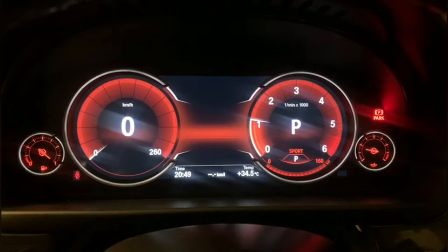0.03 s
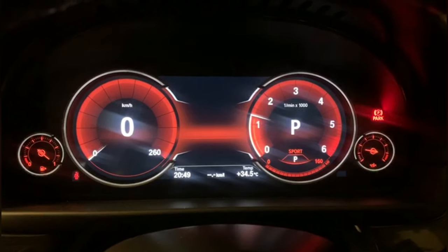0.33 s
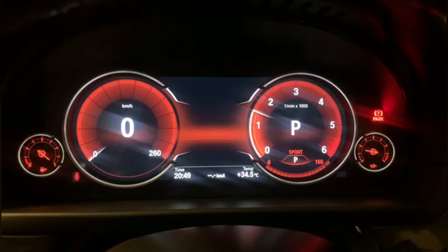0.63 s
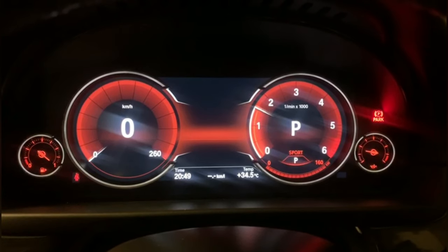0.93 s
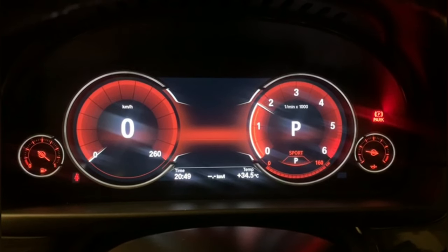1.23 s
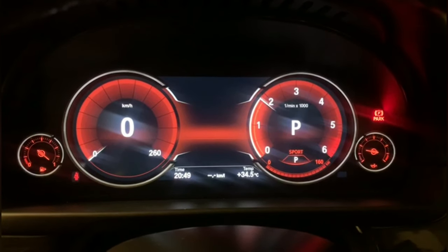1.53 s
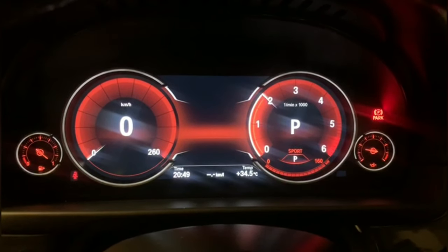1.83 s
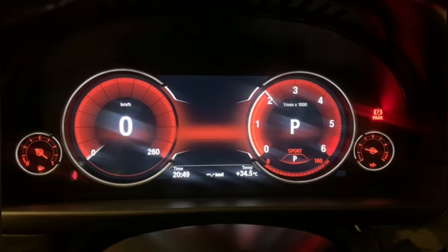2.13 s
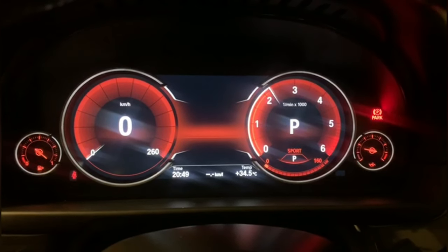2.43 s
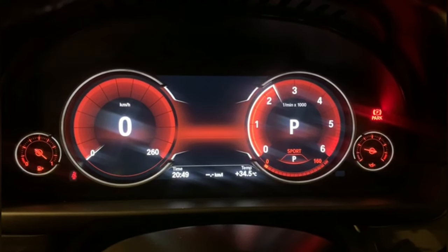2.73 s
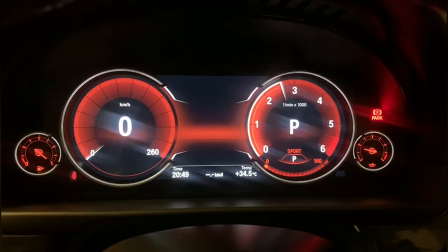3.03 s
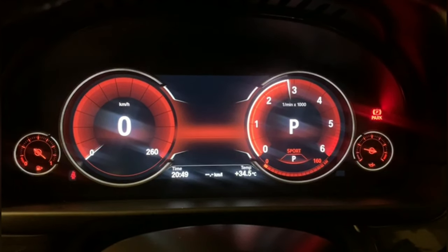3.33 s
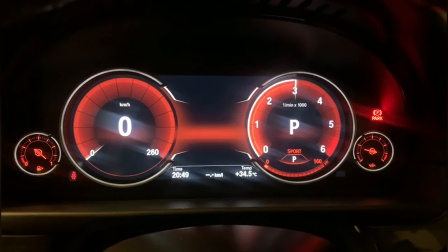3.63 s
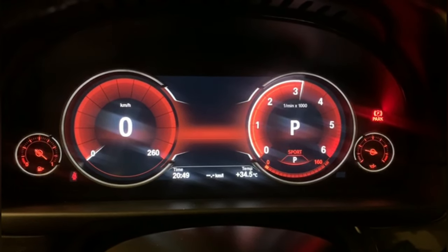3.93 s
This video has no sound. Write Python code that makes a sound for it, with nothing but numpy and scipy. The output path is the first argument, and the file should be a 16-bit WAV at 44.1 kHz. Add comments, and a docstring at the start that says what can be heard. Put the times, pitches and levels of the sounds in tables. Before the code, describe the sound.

Heard inside the cabin of a parked car, a diesel engine hums at low revs and climbs steadily. Two dull bumps sound near the start, then a faint whine and a hardening clatter build with the rising engine.

```python
"""A parked four-cylinder diesel is revved smoothly for four seconds, heard from the driver's seat.
It starts near 1250 rpm with the hum of its firing tone, and two soft thuds sound in the first second.
As it climbs, the harmonics boom in turn through the cabin's resonances and the belt drive whines faintly.
From about 2.5 s the cylinders pull less evenly and the clatter hardens, while the rush of the
engine bay keeps growing up to 3400 rpm."""
import sys
import numpy as np
from scipy import signal
from scipy.fft import rfft, irfft
from scipy.io import wavfile
from scipy.ndimage import uniform_filter1d

SR = 44100
rng = np.random.default_rng(int(sys.argv[2]) if len(sys.argv) > 2 else 0)


def generate_wav(signal):
    """Clip the signal to [-1, 1] and save it as 16-bit WAV at the path in sys.argv[1]."""
    frames = np.transpose(np.atleast_2d(signal))
    scaled = np.clip(frames, -1, 1) * 32767
    pcm = np.round(scaled).astype(np.int16)
    wavfile.write(sys.argv[1], SR, pcm)


N = 176400
TIME, FREQS = np.arange(N) / SR, np.fft.rfftfreq(N, 1 / SR)
CYLINDERS, REFERENCE_RATE_HZ = 4, 100
LEFT_LEAD_S = 0.000362


def amp(db):
    return 10 ** (np.asarray(db) / 20)


def read(points, hz, column=1):
    """One column of a table, interpolated over log frequency."""
    table = np.array(points, float)
    return np.interp(np.log(hz + 1), np.log(table[:, 0] + 1), table[:, column])


def ramp(x, low, high):
    """0 below low, 1 above high."""
    return np.clip((x - low) / (high - low), 0, 1)


# Engine speed. Each row: time in seconds, firing rate in Hz.
FIRING_RATE = [(0.0, 42.2), (0.25, 45.38), (0.5, 49.01), (0.75, 52.99), (1.0, 56.2), (1.25, 60.04),
               (1.5, 63.28), (1.75, 67.0), (2.0, 70.47), (2.25, 74.61), (2.5, 78.44), (2.75, 83.86),
               (3.0, 91.08), (3.25, 97.41), (3.5, 102.84), (3.75, 108.3), (4.0, 113.6)]

def crankshaft():
    """Phase is the integral of frequency: returns the firing rate and the running count of firings."""
    rate = np.interp(TIME, *np.transpose(FIRING_RATE))
    return rate, np.cumsum(rate) / SR


def tone(multiple, rate, firings, db):
    """A partial locked to the crankshaft; a path difference brings it to the left side first."""
    hz = multiple * rate
    phase = 2 * np.pi * (multiple * firings + rng.random())
    lead = 2 * np.pi * hz * LEFT_LEAD_S
    return np.sqrt(2) * amp(db) * side_gains(hz) * np.cos([phase + lead, phase])


# The firing tone in the cabin, with the body's nulls. Each row: frequency in Hz, level in dB.
HUM_LEVEL = [(42, -22.5), (43.6, -24.5), (44.6, -29), (46.2, -23.5), (49.5, -23.5), (51.5, -27.5),
             (53, -49), (54, -26.5), (56.4, -18.5), (60, -24), (62.8, -25.5), (64.5, -22.5), (70, -25),
             (72.6, -29.5), (74.2, -25), (78, -20), (84, -26), (92, -23), (96.5, -29.5), (103, -21.5),
             (113, -22)]

def firing_hum(rate, firings, waver_db=0.86):
    """Forced vibration: periodic combustion drives the body at the firing rate."""
    return tone(1, rate, firings, read(HUM_LEVEL, rate) + waver_db * waver(hz=10))


# Engine orders. Each entry: vibrations per engine cycle, then source levels in dB at low, high, top revs.
ORDER_LEVELS = {3: (-38, -24, -28), 6: (-38, -27, -36), 7: (-45, -37, -34), 8: (-21.3, -22, -17),
                9: (-42, -34, -27), 10: (-52, -23, -30), 11: (-44, -30, -28), 12: (-23.3, -24, -19.5),
                13: (-52, -26, -30), 14: (-46, -31, -29), 15: (-45, -31, -27), 16: (-28.5, -35, -35),
                17: (-42, -26, -22), 20: (-32, -30, -24.5), 24: (-40, -28, -23), 28: (-40, -28, -25),
                32: (-45, -27, -24), 35: (-46, -27, -24), 56: (-48, -36, -35)}

def engine_orders(rate, firings):
    """Harmonics of the engine cycle: uneven cylinders strengthen those between the firing harmonics."""
    uneven, top = ramp(rate, 78.4, 92.6), ramp(rate, 101, 104.3)
    out = np.zeros((2, N))
    for order, (low_db, high_db, top_db) in ORDER_LEVELS.items():
        multiple = order / CYLINDERS
        hz = multiple * rate
        source_db = low_db + (high_db - low_db) * uneven + (top_db - high_db) * top
        waver_db = 1.44 + 3.5 * ramp(hz, 330, 750)  # higher partials are rougher
        out += tone(multiple, rate, firings, source_db + cabin_db(hz) + waver_db * waver(hz=10))
    return out


# The cabin's response. Each row: frequency in Hz, gain in dB.
CABIN_RESPONSE = [(60, -8), (87, -8), (92, -13), (98, -23), (108, -23), (115, -15), (125, -10.5),
                  (132, -20), (140, -13), (146, -22), (151, -13), (157, -6), (164, 0.5), (182, 1.7),
                  (190, 0), (195, -13), (201, -9), (211, -19), (219, -19), (229, -15), (243, -23),
                  (260, -19), (280, -19), (325, -15), (365, -19), (470, -23), (530, -21), (570, -23),
                  (630, -33), (720, -29), (950, -28)]

def cabin_db(hz, panel_hz=394.5, width_hz=10.6, peak_db=9):
    """Resonance: a partial swells as it sweeps through a mode of the cabin or of one panel."""
    return read(CABIN_RESPONSE, hz) + peak_db * np.exp(-((hz - panel_hz) / width_hz) ** 2)


# Clatter relative to the rush. Each row: frequency in Hz, gain in dB.
CLATTER_SPECTRUM = [(250, -4), (480, 1), (800, 0), (2000, -1), (4000, -4)]

def clatter(rate, firings, size=8192, firing_accent_db=4, cabin_t60_s=0.15):
    """Periodic excitation: injectors and valves repeat each engine cycle, and the cabin scatters it."""
    orders = np.arange(240)
    strength = (orders >= 21) * amp(firing_accent_db * (orders % CYLINDERS == 0))
    cycle = irfft(strength * np.exp(2j * np.pi * rng.random(len(orders))), size) * size / 2
    pattern = np.interp(firings / CYLINDERS, np.arange(size) / size, cycle, period=1)
    pattern *= np.sqrt(2 * rate / CYLINDERS)  # constant power per Hz as the lines spread
    echoes = rng.standard_normal((2, size)) * amp(-60 * TIME[:size] / cabin_t60_s)
    echoes /= np.linalg.norm(echoes, axis=1, keepdims=True)
    scattered = signal.fftconvolve(pattern[None], echoes, axes=1)[:, :N]
    return irfft(rfft(scattered) * amp(read(CLATTER_SPECTRUM, FREQS)), N)


# Rush of the engine bay. Each row: frequency in Hz, base spectral density in dB at the reference rate,
# growth in dB per doubling of speed.
RUSH_SPECTRUM = [(22, -71, -3.5), (44.6, -62.5, 2), (63, -47, 4), (90, -55.5, 3), (130, -56.5, -1),
                 (172, -57.5, 2.5), (265, -62, 5.5), (294, -58.5, 6.5), (430, -67.5, 3.5), (567, -70, 5.5),
                 (923, -69.5, 5.5), (990, -78, 6), (1330, -76.5, 8), (2200, -81, 6.5), (3100, -83, 9),
                 (4340, -85.5, 5.5), (6620, -88, 9), (6950, -100.5, 8), (10900, -97, 14.5)]
# Resonances of block and covers. Each row: centre in Hz, width in Hz, gain in dB.
BLOCK_MODES = [(738, 15, 3), (805, 20, 3), (918, 30, 4), (1115, 30, 3.5), (1286, 50, 5), (1435, 30, 3),
               (1520, 35, 4.5), (1845, 50, 7.5), (2080, 50, 3), (2420, 120, 4), (2750, 50, 4.5),
               (2980, 70, -3), (3150, 60, 4.5), (3430, 100, 5.5), (3790, 60, 2), (3960, 90, -3),
               (4230, 120, 4), (4620, 90, -2.5), (4880, 50, 2.5), (5720, 50, 2.5)]
# Fine, still ripple left by cabin reflections. Each row: frequency in Hz, standard deviation in dB.
REFLECTION_RIPPLE = [(600, 0), (1500, 1), (4000, 1.8), (9000, 2.2)]

def bay_spectrum_db(hz, rate, knock_db=4, knock_hz=1460, knock_octaves=0.71):
    """Resonant filtering by block and cabin, over frequency and time; speed brightens the spectrum."""
    modes = sum(db * np.exp(-((hz - centre) / width) ** 2) for centre, width, db in BLOCK_MODES)
    ripple = read(REFLECTION_RIPPLE, hz) * rng.standard_normal(len(hz))
    steady = read(RUSH_SPECTRUM, hz) + modes + ripple
    growth = np.outer(read(RUSH_SPECTRUM, hz, column=2), np.log2(rate / REFERENCE_RATE_HZ))
    knock_band = knock_db * np.exp(-(np.log2((hz + 1) / knock_hz) / knock_octaves) ** 2)
    knock = np.outer(knock_band, rate > 81)  # combustion turns hard at this firing rate
    return steady[:, None] + growth + knock


# Fine random patchiness, mostly in the treble. Each row: frequency in Hz, standard deviation in dB.
SHIMMER_DEPTH = [(200, .5), (700, 1), (1200, 1.8), (2200, 2), (4000, 3), (9000, 2)]

def shimmer_db(hz, frames):
    """Random amplitude modulation in patches of frequency and time: a faint watery shimmer over noise."""
    patches = uniform_filter1d(rng.standard_normal((len(hz), frames)), 8, axis=0)
    patches = uniform_filter1d(patches, 3, axis=1)
    return read(SHIMMER_DEPTH, hz)[:, None] * patches / patches.std()


# Likeness of left and right. Each row: frequency in Hz, coherence from 0 to 1.
COHERENCE = [(100, 1), (200, 0.76), (300, 0.11), (430, 0.083), (560, 0.59), (700, 1), (900, 0.4),
             (1050, 0.21), (1300, 0.42), (1850, 0.17), (2600, 0.34), (4100, 0.13), (6000, 0.11),
             (11000, .05)]

def engine_bay(rate, firings):
    """Source and filter: throbbing rush and clatter ring the block and arrive partly coherent."""
    throb = 1 + 0.033 * np.cos(2 * np.pi * firings / CYLINDERS) + 0.012 * np.cos(2 * np.pi * firings)
    rush = rng.standard_normal((2, N)) * np.sqrt(SR / 2)
    drive = throb * (rush + clatter(rate, firings))
    framing = dict(fs=SR, nperseg=2048, noverlap=1536)
    hz, times, (shared, separate) = signal.stft(drive, **framing)
    coherence = read(COHERENCE, hz)[:, None]
    left = shared * np.exp(2j * np.pi * hz * LEFT_LEAD_S)[:, None]
    right = coherence * shared + np.sqrt(1 - coherence ** 2) * separate
    gain_db = bay_spectrum_db(hz, np.interp(times, TIME, rate)) + shimmer_db(hz, len(times))
    spectra = np.array([left, right]) * side_gains(hz)[:, :, None] * amp(gain_db)
    return signal.istft(spectra, **framing)[1][:, :N]


# Belt-driven accessories. Each row: multiple of the firing rate, source level in dB at the reference
# rate, growth in dB per doubling of speed.
ACCESSORY_TONES = [(4.55, -29.5, 5), (4.79, -28, 4), (5.78, -33, 1), (8.3, -24.5, 13), (10.55, -24, 9)]

def belt_whine(rate, firings, waver_db=2):
    """Non-integer drive ratios put the accessories' faint tones between the engine orders."""
    doublings = np.log2(rate / REFERENCE_RATE_HZ)
    out = np.zeros((2, N))
    for multiple, db, growth_db in ACCESSORY_TONES:
        source_db = db + growth_db * doublings + waver_db * waver(hz=8)
        out += tone(multiple, rate, firings, source_db + cabin_db(multiple * rate))
    return out


# Soft thuds in the cabin. Each row: start in seconds, level in dB.
CABIN_THUDS = [(0.482, -29), (0.722, -33.5)]

def thuds(rise_s=0.0063, t60_s=0.17, corner_hz=130):
    """Damping: dull bumps of low noise decay exponentially in the upholstery."""
    low_band = ramp(FREQS, 27.5, 55) / (1 + (FREQS / corner_hz) ** 1.7)
    body = irfft(rfft(rng.standard_normal(N)) * low_band, N)
    envelope = np.zeros(N)
    for start, db in CABIN_THUDS:
        age = np.maximum(TIME - start, 0)
        envelope += amp(db - 60 * age / t60_s) * ramp(age, 0, rise_s)
    return envelope * body / body.std()


def waver(hz):
    """Low-pass noise: slow random motion of unit standard deviation."""
    motion = irfft(rfft(rng.standard_normal(N)) * np.exp(-(FREQS / hz) ** 2), N)
    return motion / motion.std()


# Balance at the driver's seat. Each row: frequency in Hz, left minus right in dB.
SEAT_BALANCE = [(50, -3.5), (80, 0), (110, 0.5), (150, -2), (185, -10), (230, -5.5), (330, 6.5), (450, 6.5),
                (600, -2.5), (850, 5), (1100, 1.5), (7000, 1)]

def side_gains(hz):
    """Level difference between left and right at constant total power."""
    difference_db = read(SEAT_BALANCE, hz)
    pair = amp([difference_db / 2, -difference_db / 2])
    return pair / np.sqrt(np.mean(pair ** 2, axis=0))


def scene():
    """Superposition: the engine's layers, all driven by one speed curve, add to the thuds."""
    rate, firings = crankshaft()
    tones = firing_hum(rate, firings) + engine_orders(rate, firings) + belt_whine(rate, firings)
    return tones + engine_bay(rate, firings) + thuds()


# Response of the microphone ports. Each row: frequency in Hz, left gain in dB, right gain in dB.
PORT_RESPONSE = [(7380, -3, -2), (8040, 4.5, 10.5), (7920, 12.5, 19), (8940, -2, 13), (9330, -6.5, 11.5),
                 (10800, 2, -0.5), (11260, -17, -4)]

def record(dry, fade_s=0.004, cutoff_hz=11350):
    """Port resonance colours the treble, and a low-pass filter limits the band."""
    fade = np.sin(np.pi / 2 * ramp(np.minimum(TIME, TIME[::-1]), 0, fade_s)) ** 2
    ports = amp([read(PORT_RESPONSE, FREQS), read(PORT_RESPONSE, FREQS, column=2)])
    heard = irfft(rfft(dry * fade) * ports, N)
    low_pass = signal.firwin(401, cutoff_hz, window=("kaiser", 9), fs=SR)
    return signal.oaconvolve(heard, low_pass[None], "same")


dry = scene()
out = record(dry)
generate_wav(out)
```